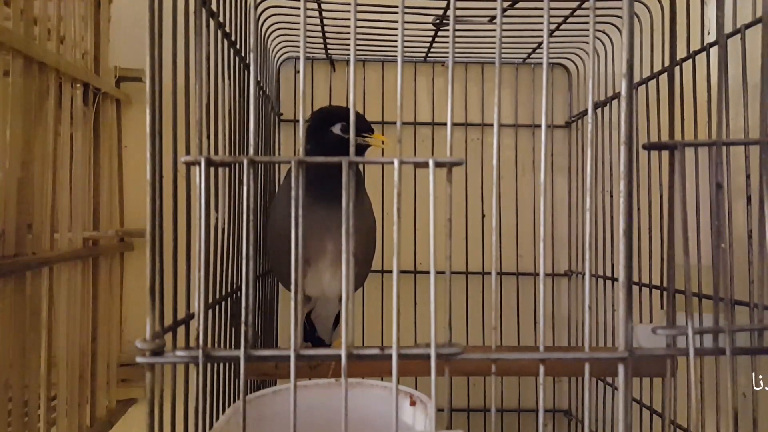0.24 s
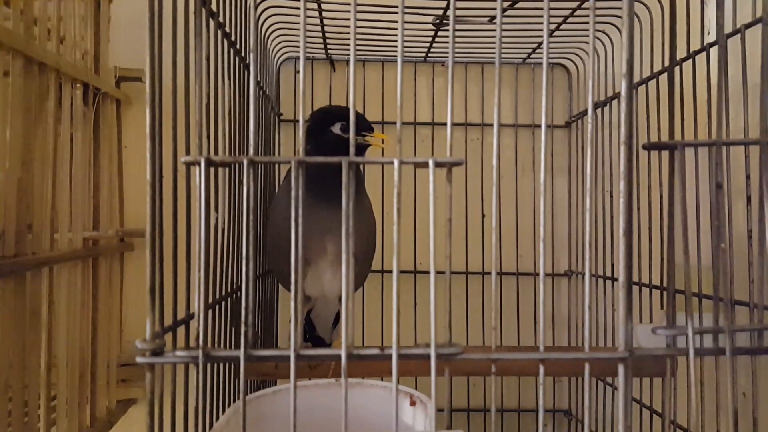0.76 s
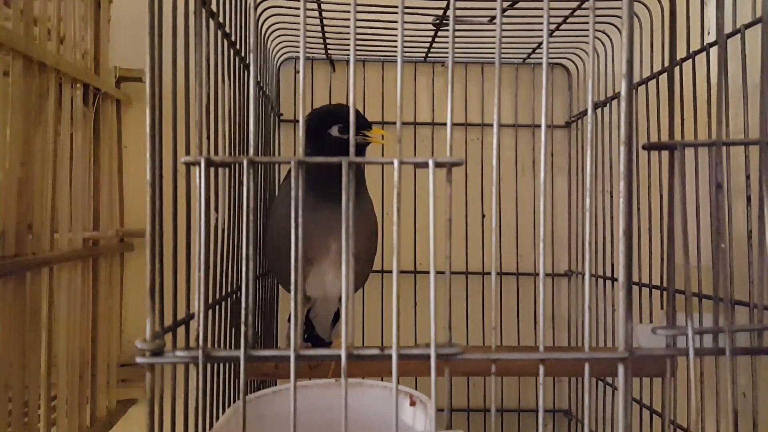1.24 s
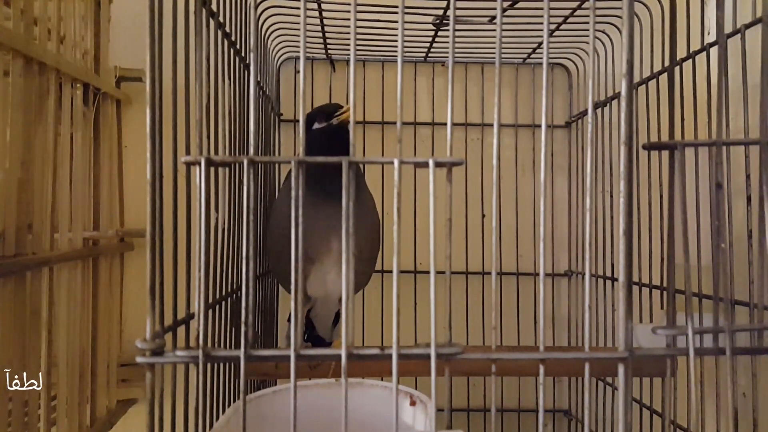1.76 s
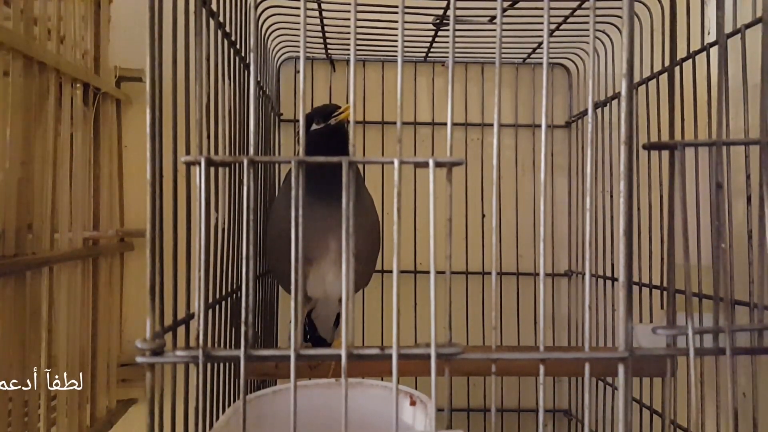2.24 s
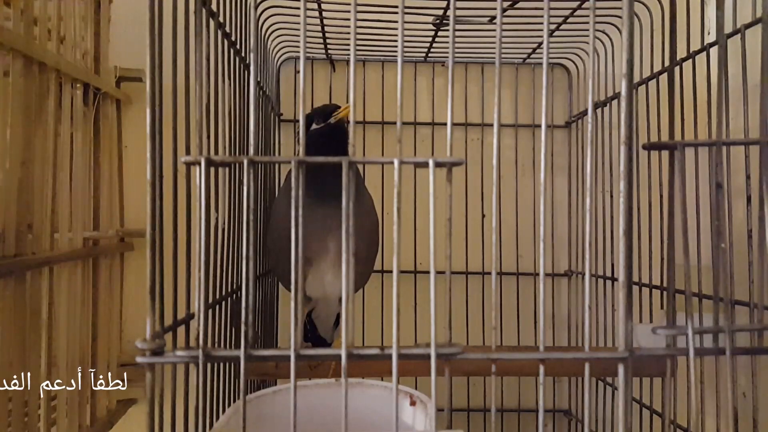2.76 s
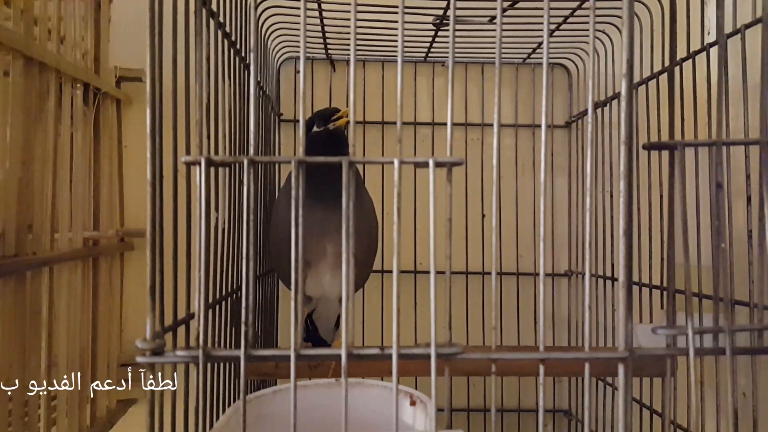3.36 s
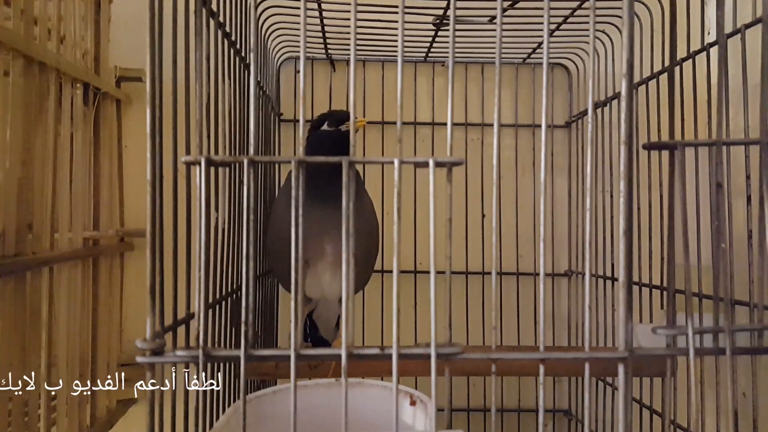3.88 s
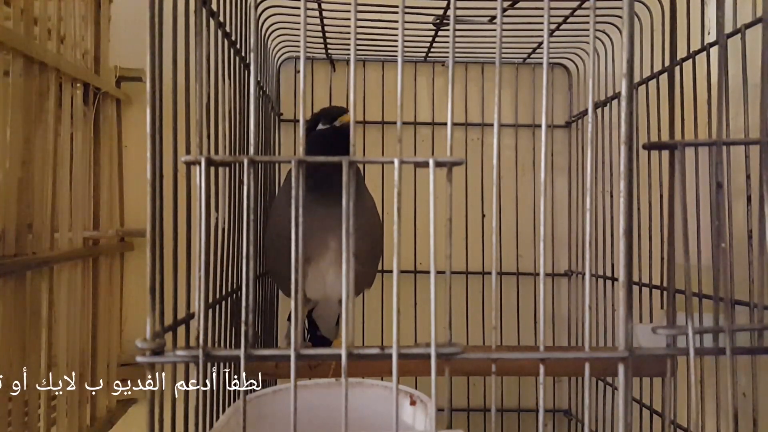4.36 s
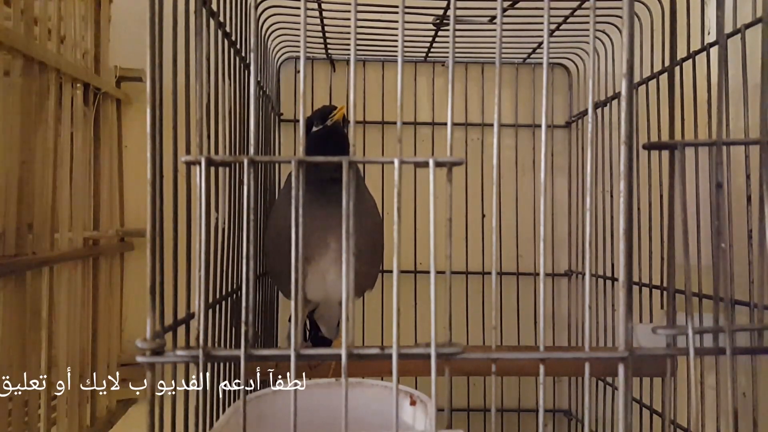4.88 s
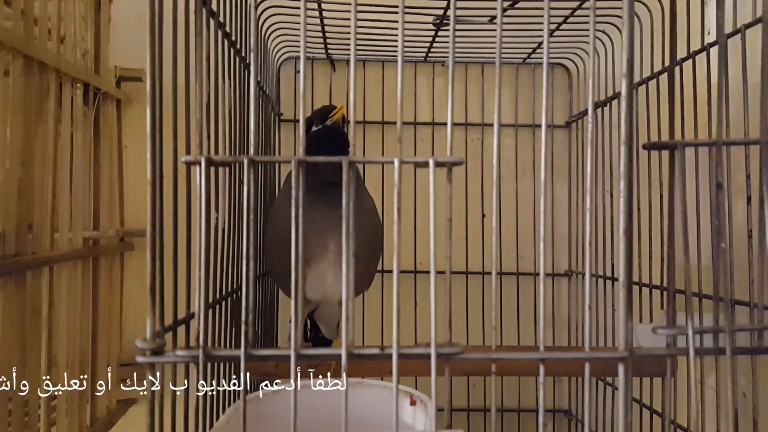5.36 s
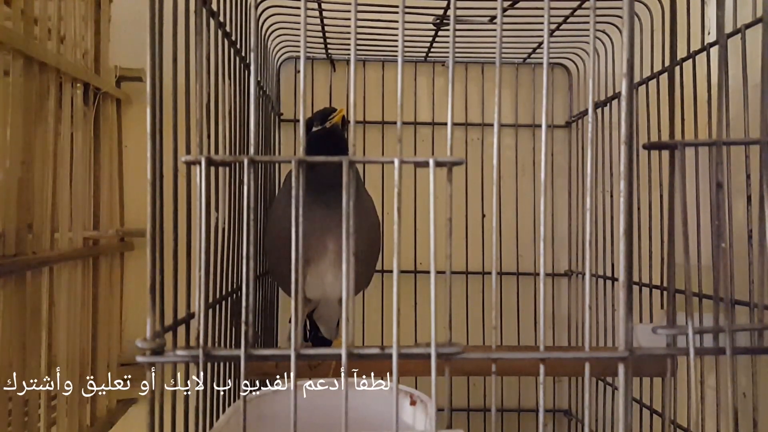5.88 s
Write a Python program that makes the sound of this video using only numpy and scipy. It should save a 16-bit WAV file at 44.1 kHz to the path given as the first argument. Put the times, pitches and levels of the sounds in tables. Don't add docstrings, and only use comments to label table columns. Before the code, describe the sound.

A myna in a wire cage sings close to the microphone in a hard-walled, ringing room. Rapid clear whistles alternate high and low, some buzzy, then run into stepping-down warbled trills. Three sharp swoops follow, then six short raspy clucks, a thin sliding whistle, a faint long glide and a last burst of slides ending on a low whistle. A low machine hum continues underneath.

```python
import sys
import numpy as np
from scipy import signal
from scipy.fft import rfft, irfft, next_fast_len
from scipy.io import wavfile
from scipy.ndimage import uniform_filter1d, minimum_filter1d, map_coordinates

SR = 44100
rng = np.random.default_rng(int(sys.argv[2]) if len(sys.argv) > 2 else 0)


def gain_from_db(level_db):
    decades = np.asarray(level_db, float) / 20
    return 10 ** decades


def wav_out(sig):
    wavfile.write(sys.argv[1], SR, np.round(np.clip(np.atleast_2d(sig).T, -1, 1) * 32767).astype(np.int16))


N = 269892
LEAD = SR // 2

# start in seconds, length in seconds, level in dB.
AIR_BUZZES = [
    (4.626, 0.13, -53.5),
    (5.876, 0.095, -48.5),
]


def along(points, hz):
    f, v = np.transpose(points)
    return np.interp(np.log(hz + 1), np.log(f + 1), v)


def filtered(x, response):
    m = next_fast_len(x.shape[-1] + 8192)
    hz = np.fft.rfftfreq(m, 1 / SR)
    return irfft(rfft(x, m) * response(hz), m)[..., :x.shape[-1]]


def noise(spectrum, size):
    x = filtered(rng.standard_normal(size), lambda hz: gain_from_db(along(spectrum, hz)))
    return x / np.std(x)


def wobble(rate, size):
    knots = rng.standard_normal(int(size * rate / SR) + 4)
    return map_coordinates(knots, [np.arange(size) * rate / SR])


def span(s, length):
    return np.arange(s, s + length, 1 / SR)


def track(rows):
    s, *cols = np.transpose(rows)
    t = np.arange(s[0], s[-1], 1 / SR)
    return t, [uniform_filter1d(np.interp(t, s, c), size=150, mode="nearest") for c in cols]


def gate(t, rise, fall):
    ramp = np.minimum((t - t[0]) / rise, (t[-1] - t) / fall)
    return np.clip(ramp, 0, 1) ** 2.7


def add(song, t, x):
    part = song[LEAD + round(t[0] * SR):][:len(x)]
    part += x[:len(part)]


def hum():
    # frequency in Hz, level in dB rms.
    machine_orders = [(37.2, -59.5), (74.3, -51.5), (148.6, -55.5), (220.7, -61.5), (317.6, -62)]
    # frequency in Hz, density in dB per Hz.
    air_colour = [(15, -52.5), (25, -10.5), (43, -14.5), (80, 0), (119, -11), (151, -5), (176, -13),
                  (316, -12), (897, -23), (1500, -23.5), (1950, -58), (3300, -120)]
    # time in seconds, level in dB.
    air_level = [(0.0, -55), (1.04, -49), (3.0, -49), (4.36, -46), (4.8, -48), (6.12, -49)]
    # frequency in Hz, likeness of left and right (0 to 1).
    likeness = [(60, 1), (130, 0.92), (290, .82), (640, 0.58), (1400, 0.019)]
    hiss_colour = [(600, -38.5), (1500, -1.5), (3000, -1.0), (4300, -19), (8000, -19), (9500, -28),
                   (15500, -28.0), (16500, -120)]
    t = np.arange(N) / SR
    lines = 0
    for hz, db in machine_orders:
        level = gain_from_db(db + 2 + 0.67 * wobble(6.2, N))
        lines = lines + level * np.sin(2 * np.pi * hz * t + 0.5 * wobble(4, N))

    def mid_side_gains(hz):
        turn = np.arccos(np.clip(along(likeness, hz), -1, 1)) / 2
        return np.array([np.cos(turn), np.sin(turn)])

    mid, side = filtered(np.array([noise(air_colour, N), noise(air_colour, N)]), mid_side_gains)
    air = gain_from_db(np.interp(t, *np.transpose(air_level)) + 2.0) * np.array([mid + side, mid - side])
    hiss = gain_from_db(-57.0) * np.array([noise(hiss_colour, N) for _ in "LR"])
    return lines + air + hiss


def whistle(hz, second_db, third_db, breath_db, unsteady):
    # frequency in Hz, gain in dB.
    beak = [(3000, 9), (3800, 11.5), (4500, -4), (5500, -1), (6600, -11.5), (7300, -7.5), (7900, 5.5),
            (8500, -9), (9200, -5), (10200, -12), (12000, -4.5), (15500, -5)]
    phase = 2 * np.pi * np.cumsum(hz * (1 + unsteady * wobble(300, len(hz)))) / SR

    def blur(db):
        return 1 + gain_from_db(db) * wobble(1800, len(hz))

    overtones = [(2, second_db), (3, third_db), (4, third_db - 12.5), (5, third_db - 20.5)]
    upper = 0
    for k, db in overtones:
        below_16k = np.clip(16 - k * hz / 1000, 0, 1)
        upper = upper + gain_from_db(db + along(beak, k * hz)) * below_16k * np.sin(k * phase)
    return blur(breath_db) * np.sin(phase) + blur(breath_db + 12) * upper


def piping():
    # start in seconds, held pitch in Hz, level in dB.
    high = [
        (.43, 3010, -10.5),
        (.698, 2795, -7),
        (0.97, 2786, -7.5),
        (1.247, 2787, -6),
        (1.635, 2980, -8.5),
        (2.031, 2977, -6.5),
    ]
    # start in seconds, scoop start in Hz, held pitch in Hz, level in dB.
    low = [
        (.277, 2242, 2317, -8),
        (.554, 2240, 2283, -8.5),
        (.827, 2233, 2273, -8),
        (1.094, 2152, 2240, -8.5),
        (1.487, 2119, 2258, -7),
        (1.883, 2113, 2255, -6),
        (2.423, 2126, 2255, -7),
    ]
    # start in seconds, held pitch in Hz, level in dB.
    tight = [
        (1.366, 2672, -10),
        (1.752, 2672, -9),
        (2.162, 2692, -9),
        (2.582, 2727, -9.5),
    ]
    # start in seconds, length in seconds, scoop start in Hz, held pitch in Hz, level in dB.
    stray = [(-.3, 0.12, 1420, 1201, -34), (-.25, .1, 2300, 2600, -17.5), (-.2, 0.0897, 3716, 3337, -15),
             (-.16, 0.054, 2360, 2850, -15), (-.1, 0.065, 2137, 1932, -15), (.004, 0.028, 3900, 3350, -26),
             (0.017, 0.081, 2272, 2950, -11), (0.158, 0.057, 2172, 1932, -15.5),
             (2.285, 0.084, 2175, 1912, -17), (2.434, .095, 2900, 2828, -11),
             (3.417, 0.04, 1067, 1067, -45.5), (3.45, 0.049, 1183, 1345, -34.5),
             (4.979, 0.0291, 1583, 1910, -32), (5.092, 0.0311, 1397, 2070, -26.5),
             (5.132, 0.035, 1978, 2080, -32), (6.076, 0.11, 1949, 1865, -14.5)]
    # length in seconds (not for strays), end over held pitch, opening level in dB.
    high_shape, low_shape, tight_shape, stray_shape = (.066, 0.99, -7.5), (.063, 0.94, -6.5), (.068, 0.91, -6), (0.95, -2.5)
    leap_from, leap_to, crest = .3, .35, .55
    notes = [(s, *high_shape, 2362, hz, db, False) for s, hz, db in high]
    notes += [(s, *low_shape, scoop, hz, db, False) for s, scoop, hz, db in low]
    notes += [(s, *tight_shape, 2300, hz, db, True) for s, hz, db in tight]
    notes += [(s, length, *stray_shape, scoop, hz, db, s < .01) for s, length, scoop, hz, db in stray]
    song = np.zeros(N + LEAD)
    for s, length, sag, open_db, scoop, held, db, harsh in notes:
        landing = min(held, max(scoop, 2805))
        leap_db = -7.5 * min(abs(held - scoop) / 500, 1)
        t, (hz, swell) = track([
            (s, scoop, open_db),
            (s + leap_from * length, .7 * scoop + .3 * held, open_db),
            (s + leap_to * length, landing, leap_db),
            (s + crest * length, held * (3 + sag) / 4, 0),
            (s + length, sag * held, -2)])
        if harsh:
            tone = whistle(hz, -32.5, -36.5, -37.0, unsteady=0.0088)
        else:
            tone = whistle(hz, -38.0, -41.5, -45.0, unsteady=0.0031)
        add(song, t, gain_from_db(db + swell) * gate(t, 0.011, 0.011) * tone)
    return song


def breath(song):
    # frequency in Hz, density in dB per Hz.
    breath_colour = [(2600, -120), (3400, 2.5), (5200, 6.5), (6500, -8), (7900, -1.5), (8800, -9.5),
                     (10000, 3), (10800, -22.5), (15500, -30), (16500, -120)]
    strained = filtered(song, lambda hz: np.clip((hz - 2250) / 300, .25, 1))
    effort = gain_from_db(-44) * np.sqrt(np.abs(uniform_filter1d(strained ** 2, size=300)))
    for s, length, db in AIR_BUZZES:
        t = span(s, length)
        add(effort, t, gain_from_db(db) * gate(t, 0.0032, 0.06))
    return effort * noise(breath_colour, len(song))


def shuffles():
    # start in seconds, length in seconds, level in dB.
    foot_moves = [
        (2.37, .09, -50),
        (3.66, .1, -47),
    ]
    # frequency in Hz, density in dB per Hz.
    perch_colour = [(200, -120), (350, 2.5), (1300, 4.5), (2000, -16), (6000, -8.5), (9000, -24),
                    (10000, -120)]
    song = np.zeros(N + LEAD)
    for s, length, db in foot_moves:
        t = span(s, length)
        level = gain_from_db(db + 2.2 * wobble(200, len(t)))
        add(song, t, level * gate(t, 0.012, 0.05) * noise(perch_colour, len(t)))
    return song


def trills():
    # start in seconds, length in seconds, top pitch in Hz, bottom pitch in Hz, level in dB.
    trill_steps = [
        (2.631, 0.094, 2500, 1895, -18),
        (2.7, .15, 2466, 1729, -17.5),
        (2.847, 0.14, 1998, 1443, -23),
        (2.971, .125, 2154, 1640, -16.5),
        (3.091, 0.13, 2029, 1474, -15),
    ]
    beak_hiss = [(9000, -120), (9500, 1), (10400, -3.5), (11000, -120)]  # (Hz, dB per Hz)
    song = np.zeros(N + LEAD)
    for s, length, top, bottom, db in trill_steps:
        t = span(s, length)
        since = t - trill_steps[0][0]
        rate = (120 - 25.2 * since) * (1 + 0.1584 * wobble(50, len(t)))
        height = .5 + .5 * np.cos(2 * np.pi * np.cumsum(rate) / SR)
        hz = bottom + (top - bottom) * height - 500 * (t - s)
        top_louder_db = 4 + 18 * since
        level_db = db + top_louder_db * (height - 1) + 3.4 * wobble(45, len(t))
        tone = whistle(hz, -48, -39.5, -23.5, unsteady=0.0073)
        hiss = gain_from_db(-44.5) * noise(beak_hiss, len(t))
        add(song, t, gain_from_db(level_db) * gate(t, 0.0098, 0.0098) * (tone + hiss))
    return song


def rich_note():
    # time in seconds, pitch in Hz, level in dB.
    rich_path = [(2.795, 1411, -10.5), (2.82, 1384, -7.5), (2.88, 1392, -13), (2.97, 1383, -16.5),
                 (3.02, 1383, -14.5)]
    # multiple of the pitch, level in dB.
    rich_partials = [(1, -33), (2, 8.5), (3, -35), (4, -37.5), (5, -74), (6, -54), (7, -55), (8, -43),
                     (9, -52.5)]
    song = np.zeros(N + LEAD)
    t, (hz, db) = track(rich_path)
    throb = np.abs(np.cos(np.pi * 31 * (t - 2.828))) ** 0.87 * gain_from_db(1.7 * wobble(47, len(t)))
    phase = 2 * np.pi * np.cumsum(hz * (1 + 0.0074 * wobble(100, len(t)))) / SR
    tone = sum(gain_from_db(level) * np.sin(round(k) * phase) for k, level in rich_partials)
    add(song, t, gain_from_db(db - 7.5) * throb * gate(t, 0.012, 0.015) * tone)
    return song


def add_glide(song, t, db, tone):
    add(song, t, gain_from_db(db + 1.89 * wobble(110, len(t))) * gate(t, 0.0048, 0.007) * tone)


def swoops():
    # summit time in seconds, summit pitch in Hz, rise in seconds, fall in seconds, level in dB.
    swoop_summits = [
        (3.43, 4252, .035, .03, -18),
        (3.607, 5100, 0.025, .04, -16.5),
        (3.798, 5295, .025, .048, -17),
    ]
    start_hz, leave_hz, land_hz, rest_hz = 2600, 2785, 3034, 2900
    low_db, flank_db, summit_db, rest_db = -14, -22.5, -11.5, -23
    song = np.zeros(N + LEAD)
    for s, top, rise, fall, db in swoop_summits:
        t, (hz, level_db, over_db) = track([
            (s - rise - .025, start_hz, -5, low_db),
            (s - rise, leave_hz, -5, low_db),
            (s - .52 * rise, .85 * top + 0.13 * leave_hz, 0, flank_db),
            (s, top, -6, summit_db),
            (s + 0.58 * fall, .42 * top + 0.52 * land_hz, -3, summit_db),
            (s + fall, land_hz, 7, rest_db),
            (s + fall + .038, rest_hz, 6.5, rest_db)])
        add_glide(song, t, db + level_db, whistle(hz, over_db, over_db - 14.5, -16, unsteady=.012))
    return song


def clucks():
    # start in seconds, length in seconds, high voice in Hz, level in dB, coupling in dB.
    cluck_hits = [
        (3.95, 0.056, 1368, -21, 6),
        (4.06, 0.045, 1385, -18, -2),
        (4.176, .039, 1396, -17.5, -11),
        (4.286, 0.052, 1382, -19, -10),
        (4.398, 0.048, 1398, -20, -1),
        (4.518, 0.058, 1425, -18.5, -4),
    ]
    # times the low voice, times the high voice, level in dB.
    mixes = [(1, 0, -9), (0, 1, -2), (1, 1, -2), (2, -0.5, -14), (0, 2.5, -25), (2, 4, -32), (1, 4, -25),
             (0.27, 4, -33.5), (0.47, 6, -39.5)]
    # frequency in Hz, density in dB per Hz.
    rasp_colour = [(500, -120), (750, -5.5), (1500, 17), (3200, 8), (5000, -11), (8500, -16), (10000, -120)]
    low_hz = 1006
    song = np.zeros(N + LEAD)
    for s, length, high_hz, db, coupling_db in cluck_hits:
        t = span(s, length)
        scoop = 1 - 0.0718 * np.exp(-(t - s) / .011)
        turns = 2 * np.pi * np.cumsum(scoop + 0.021 * wobble(97, len(t))) / SR
        tones = 0
        for a, b, level in mixes:
            level_db = level + coupling_db * (a * b > .5)
            tones = tones + gain_from_db(level_db) * np.sin((round(a) * low_hz + round(b) * high_hz) * turns)
        beats = 1 + 0.84 * np.cos((high_hz - low_hz) * turns)
        rasp = gain_from_db(-8 - 170 * (t - s)) * beats * noise(rasp_colour, len(t))
        fade_db = db - 9 * (t - s) / length + 1.1 * wobble(120, len(t))
        add(song, t, gain_from_db(fade_db) * gate(t, 0.0067, 0.01) * (tones + rasp))
    return song


def thin_notes():
    # start in seconds, length in seconds, from Hz, to Hz, level in dB.
    slides = [
        (4.649, 0.12, 5190, 4240, -20.5),
        (4.664, 0.11, 4077, 3895, -20.5),
        (5.867, 0.025, 3730, 3750, -26),
        (5.876, .075, 5760, 4730, -22),
        (5.883, .1, 4187, 3930, -22),
    ]
    # start in seconds, length in seconds, from Hz, to Hz, level in dB.
    hooks = [
        (4.744, .04, 4026, 3008, -19),
        (4.882, 0.0337, 3777, 3345, -19),
        (5.981, 0.044, 3940, 2775, -20),
    ]
    # time in seconds, pitch in Hz, level in dB.
    long_glide = [(4.908, 3350, -30), (4.955, 3005, -38), (5.11, 2726, -42), (5.28, 2900, -38.5),
                  (5.35, 3370, -38), (5.44, 3556, -36), (5.55, 3598, -36), (5.62, 2960, -37.5),
                  (5.8, 2500, -50)]
    # pitch in Hz, level of the second partial in dB.
    thin_second = [(2500, -13), (2850, -3.5), (3270, 5.5), (3560, -5.5), (4050, -25), (4350, -12.5),
                   (5200, -27)]
    lines = []
    for s, length, start, end, db in slides:
        t = span(s, length)
        hz = end + (start - end) * np.exp(-2.5 * (t - s) / length)
        lines.append((t, hz, db - 19 * (1 - np.exp(-(t - s) / 0.032))))
    for s, length, start, end, db in hooks:
        t = span(s, length)
        hz = end + (start - end) * np.exp(-3 * (t - s) / length)
        lines.append((t, hz, db - 17 * np.abs((t - s) / length / 0.55 - 1)))
    t, (hz, db) = track(long_glide)
    lines.append((t, hz, db))
    song = np.zeros(N + LEAD)
    for t, hz, db in lines:
        buzzing = sum((t > s) & (t < s + length) for s, length, _ in AIR_BUZZES)
        over_db = along(thin_second, hz)
        add_glide(song, t, db, whistle(hz, over_db, over_db - 19, -36 + 22 * buzzing, unsteady=.0037))
    return song


def room(x, near_db, far_db):
    # frequency in Hz, time to fall 60 dB in seconds.
    wall_decay = [(700, 1.8), (1400, 1.58), (2400, 1.28), (4000, 0.88), (6500, 0.66), (10000, 0.61),
                  (16000, 0.15)]
    hz, t, z = signal.stft(rng.standard_normal((2, 3 * SR // 2)), SR, nperseg=256)
    decay = gain_from_db(-60 * t / along(wall_decay, hz)[:, None])
    tail = signal.istft(z * decay, SR, nperseg=256)[1]
    t = np.arange(tail.shape[1]) / SR
    tail *= 1 - np.exp(-t / 0.0032)
    near = rng.standard_normal(tail.shape) * gain_from_db(-60 * t / 0.1) * (t > .002)
    answer = gain_from_db(far_db) * tail / np.linalg.norm(tail[0]) + gain_from_db(near_db) * near / np.linalg.norm(near[0])
    return signal.fftconvolve(x[None], answer, axes=1)[:, :len(x)]


def scene():
    # frequency in Hz, left over right in dB.
    shade = [(60, -4.5), (130, -13), (290, 5.5), (640, -5), (1410, 0.5), (3100, 4.5), (6820, 17),
             (15000, 17)]
    left_leads = 5.04
    voice = piping() + trills() + rich_note() + swoops() + thin_notes()
    song = voice + breath(voice) + shuffles() + clucks()
    side = np.array([[.5], [-.5]])

    def to_ports(hz):
        delay = np.exp(2j * np.pi * hz * side * left_leads / SR)
        return gain_from_db(0.86 * side * along(shade, hz)) * delay

    direct = filtered(song, to_ports)
    echoes = room(song, near_db=-11, far_db=-6.5)
    wet = filtered(echoes, lambda hz: gain_from_db(side * along(shade, hz)))
    return gain_from_db(4.5) * (direct + wet)[:, LEAD:] + hum()


def thinned(x, masked_db):
    # frequency in Hz, level in dB.
    quiet_floor = [(3000, -100), (8300, -90), (9000, -71.5), (12000, -77), (15500, -86.5)]
    hz, _, z = signal.stft(x, SR, nperseg=2048)
    band = np.abs(uniform_filter1d(np.abs(z) ** 2, size=20, axis=1))
    masker = -minimum_filter1d(-band, size=161, axis=1)
    audible = band > gain_from_db(2 * along(quiet_floor, hz))[:, None]
    unmasked = band > masker * gain_from_db(2 * masked_db)
    kept = (audible & unmasked) | (hz < 3200)[:, None]
    return signal.istft(z * np.where(kept, 1, gain_from_db(-18)), SR, nperseg=2048)[1][:, :N]


def band_limit(x):
    return signal.sosfilt(signal.butter(12, 15720, fs=SR, output="sos"), x)


def record(dry):
    # frequency in Hz, gain in dB.
    mic_colour = [(22, -7), (34, 1), (8500, 0), (9300, -7.5), (11000, -1.5), (12500, 3), (15500, 5)]
    closing = np.clip(np.arange(N)[::-1] / 200, 0, 1)
    x = filtered(dry * closing, lambda hz: gain_from_db(along(mic_colour, hz)))
    need = np.minimum(1, .93 / (np.abs(x).max(axis=0) + 1e-9))
    gain = uniform_filter1d(minimum_filter1d(need, size=1201), size=600)
    hiss = gain_from_db(-83) * rng.standard_normal(dry.shape)
    return band_limit(thinned(x * gain, masked_db=-50.5) + hiss)


dry = scene()
out = record(dry)
wav_out(out)
```